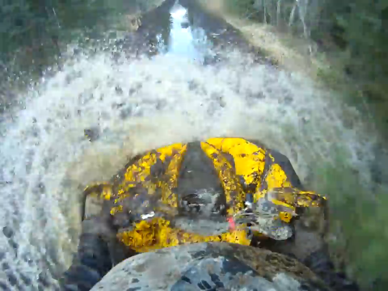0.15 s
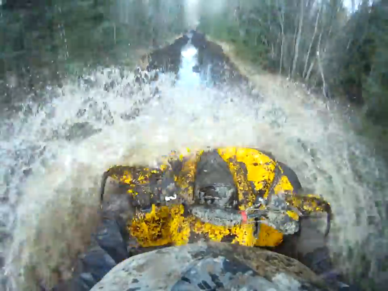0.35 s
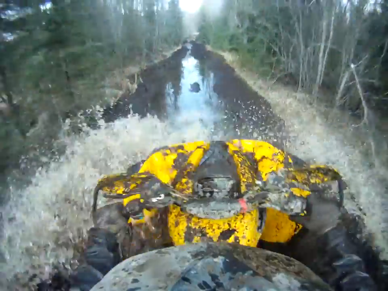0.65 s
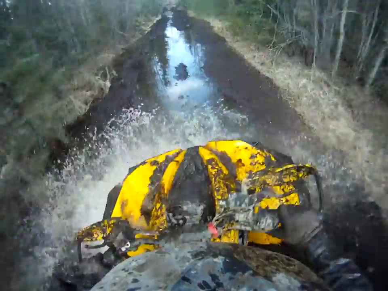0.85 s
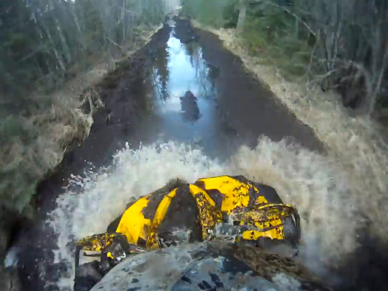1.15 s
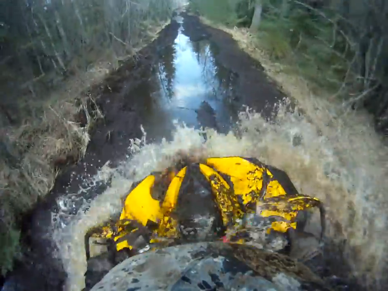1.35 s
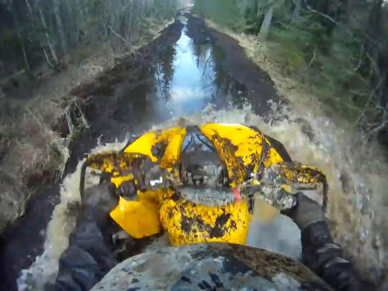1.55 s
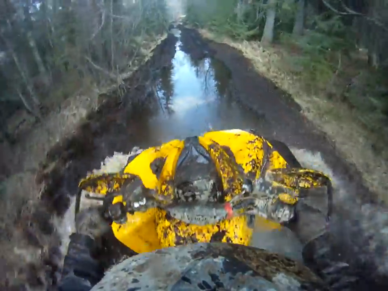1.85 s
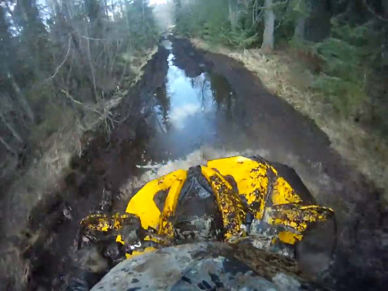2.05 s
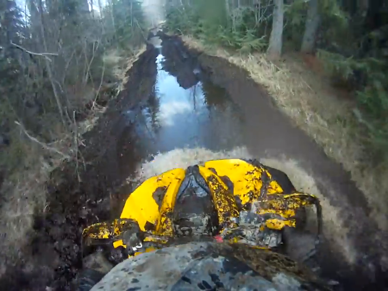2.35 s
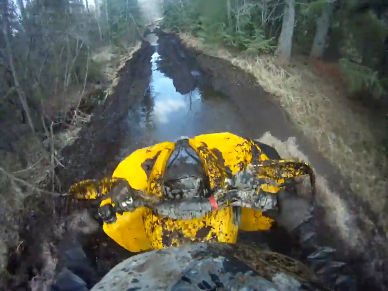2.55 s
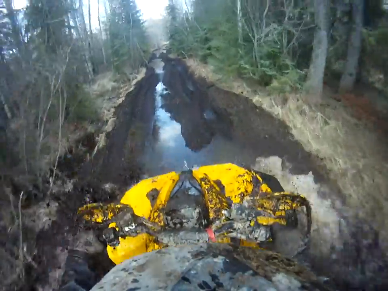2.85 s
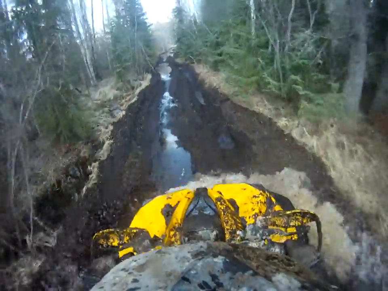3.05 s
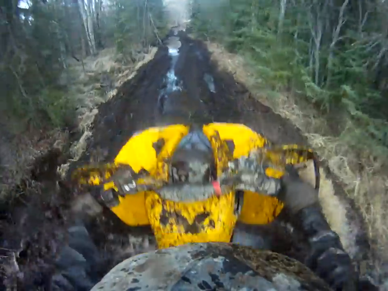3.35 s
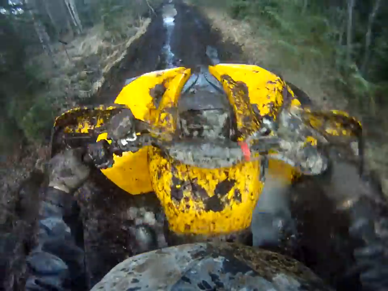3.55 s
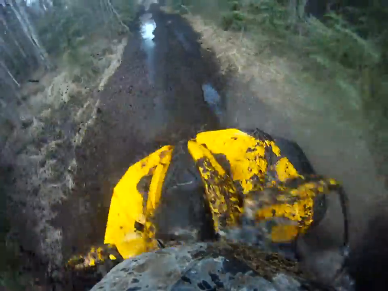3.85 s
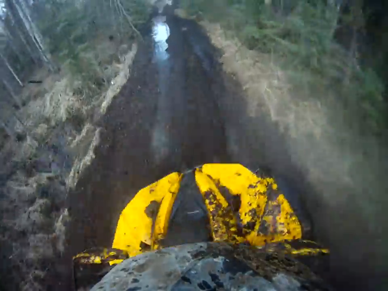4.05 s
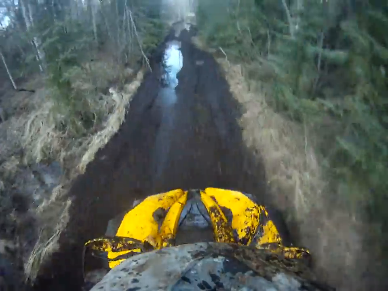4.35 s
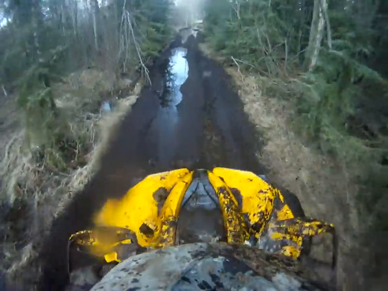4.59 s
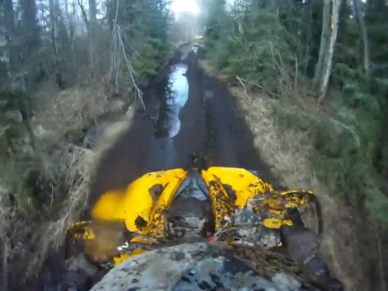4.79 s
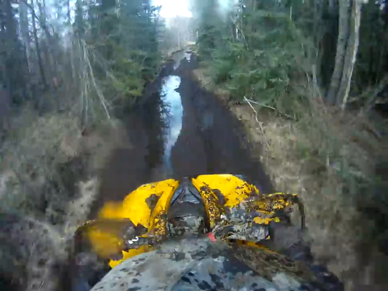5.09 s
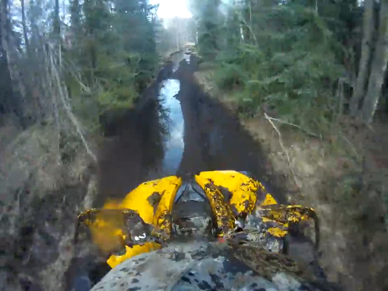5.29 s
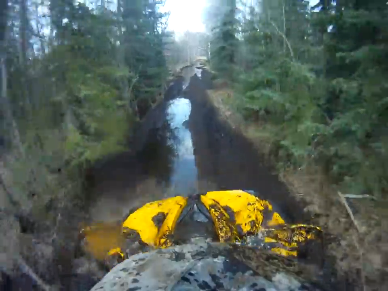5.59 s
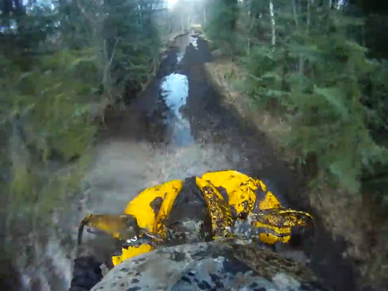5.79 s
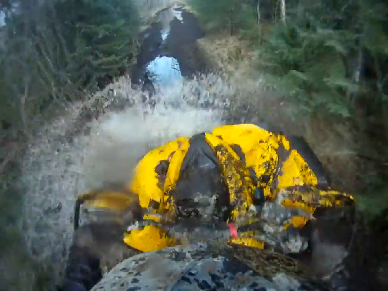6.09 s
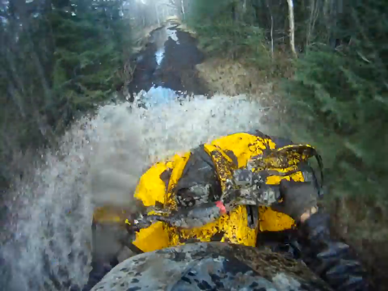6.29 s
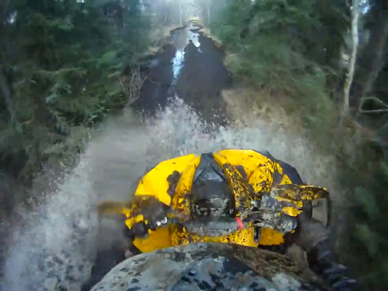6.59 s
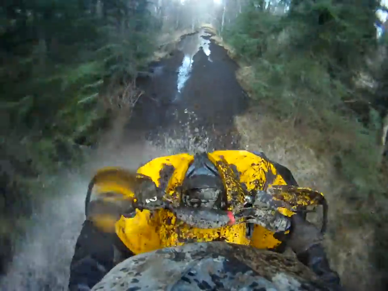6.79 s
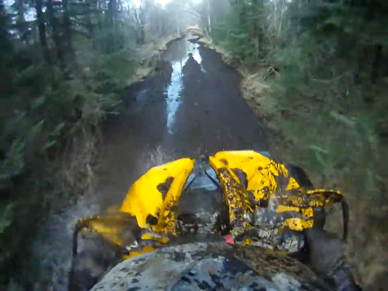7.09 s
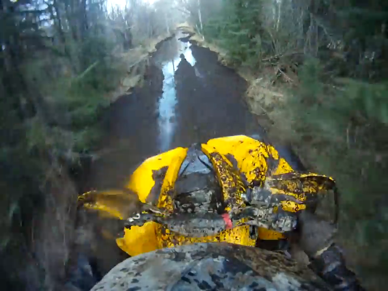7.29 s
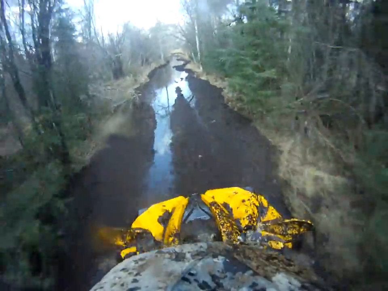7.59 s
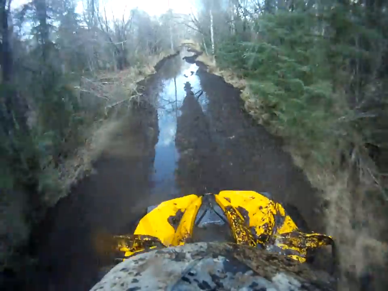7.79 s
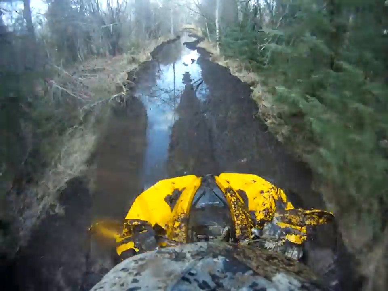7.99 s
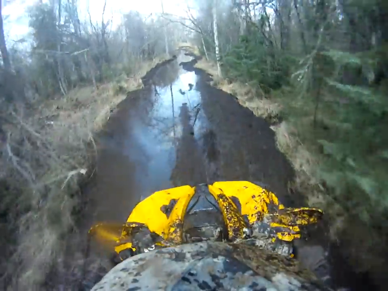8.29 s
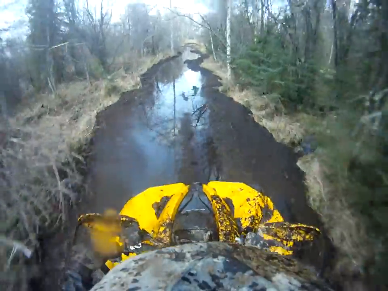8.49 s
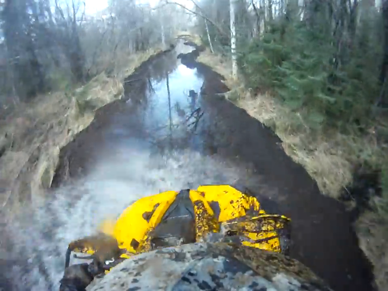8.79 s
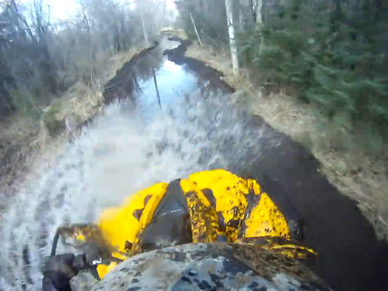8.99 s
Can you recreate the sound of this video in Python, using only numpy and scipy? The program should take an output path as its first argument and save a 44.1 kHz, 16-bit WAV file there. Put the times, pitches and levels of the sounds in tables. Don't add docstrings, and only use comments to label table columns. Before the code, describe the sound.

Rough twin-cylinder quad engine revving and dropping on a muddy trail, gears clattering, splashes hissing, mud lumps knocking the microphone housing.

```python
import sys
import numpy as np
from scipy import signal
from scipy.fft import rfft, irfft, next_fast_len
from scipy.io import wavfile
from scipy.ndimage import uniform_filter1d, map_coordinates

SR = 44100
rng = np.random.default_rng(int(sys.argv[2]) if len(sys.argv) > 2 else 0)


def gain_from_db(level_db):
    decades = np.asarray(level_db, float) / 20
    return 10 ** decades


def persist_wave(psi):
    counts = np.round(np.clip(psi, -1, 1) * 32767).astype(np.int16)
    wavfile.write(sys.argv[1], SR, np.atleast_2d(counts).T)


N = 403064

# t/s, rate/(cycles/s)
CRUISE = [(0.0, 36.2), (0.9, 34.7), (2.6, 40.0), (3.4, 46.6), (4.2, 35.6), (5.3, 40.2), (6.4, 39.3),
          (6.9, 33.8), (7.8, 31.3), (9.14, 41.0)]
# peak t/s, extra rate/(cycles/s), rise/s, fall/s
SURGES = [(0.28, 12.7, 0.112, 0.168), (0.58, 9.2, 0.075, 0.127), (1.22, 3.3, 0.108, 0.056),
          (1.5, 6.8, 0.169, 0.133), (1.73, 11.2, 0.099, 0.233), (2.02, 9.4, 0.071, 0.299),
          (3.14, 1.9, 0.149, 0.134), (3.66, 15.4, 0.147, 0.158), (4.03, 6.8, 0.097, 0.086),
          (4.39, 1.7, 0.112, 0.053), (4.71, 2.5, 0.169, 0.164), (5.09, 1.9, 0.071, 0.129),
          (5.53, 2.7, 0.103, 0.095), (5.77, 2.2, 0.045, 0.135), (6.18, 3.3, 0.129, 0.093),
          (6.66, 8.1, 0.124, 0.095), (7.1, 7.8, 0.095, 0.079), (7.38, 11.3, 0.102, 0.113),
          (7.6, 6.4, 0.3, 0.287), (8.17, 3.9, 0.245, 0.3)]
# t/s, second cylinder strength/0-1, its lag/cycles, brightness/(dB/oct), narrowness/(dB/oct^2)
FIRING = [(0.0, 0.6, 0.351, 25.0, -20.0), (0.25, 0.69, 0.379, 10.0, -3.0), (0.5, 0.57, 0.364, -12.0, 19.0),
          (0.8, 0.0, 0.345, 15.0, -19.0), (1.15, 0.28, 0.394, 16.0, -10.0), (1.75, 0.57, 0.354, 9.0, -8.0),
          (2.3, 0.0, 0.357, -5.0, 5.0), (3.1, 0.0, 0.374, 14.0, -17.0), (3.6, 0.71, 0.36, 1.0, -8.0),
          (4.15, 0.05, 0.354, 4.0, 0.0), (4.9, 0.58, 0.398, 10.0, -6.0), (5.6, 0.63, 0.396, 11.0, 7.0),
          (6.4, 0.9, 0.393, 6.0, 3.0), (6.86, 0.1, 0.366, 12.0, -12.0), (7.35, 0.76, 0.365, 5.0, 5.0),
          (7.65, 0.0, 0.345, -6.0, 25.0), (8.85, 0.0, 0.391, 1.0, 25.0), (9.14, 0.77, 0.379, 19.0, -8.0)]
# t/s, amount/0-1
SLOSH = [
    (0, 1),
    (7.55, 1),
    (7.75, .04),
    (8.95, .04),
    (9.14, .6),
]
# t/s, level/dB
OUTLET = [(0, -32), (.12, -22), (.72, -25.5), (.88, -37), (1.03, -25.5), (1.8, -31.5), (2.05, -25.5),
          (2.8, -30.5), (3.25, -36), (3.5, -23.5), (3.95, -27.5), (4.2, -31.5), (4.8, -27.5), (6.0, -28.5),
          (6.4, -28), (6.7, -29), (7.38, -26), (9.14, -27)]
# t/s, mud drag/dB, water thrown/dB
GROUND = [(0, 0, 3.4), (.6, 5.5, 1.5), (.92, 7, 4), (1.05, -1, 4), (1.3, 1.5, -1.5), (1.7, 4.5, -1.5),
          (2.1, -1, -1), (3.3, 3, 0.5), (3.75, -2, 0), (4.05, 1, 2), (4.3, -2, -.5), (6.45, -1.5, -0.3),
          (6.9, 3, 2), (7.25, 0, .1), (7.55, 1, 3.5), (7.72, .5, -4), (8.0, -4, -3.5), (9.14, 2.5, -2)]
# t/s, level/dB, width/s
SHAKES = [(.25, -1.5, .03), (1.66, 2, .05), (1.9, 6, 0.019), (1.99, 5, 0.039), (3.36, 0, .05),
          (3.5, 3, 0.1), (3.6, 1.5, 0.023), (6.22, 3.5, 0.053), (6.55, -0.5, 0.047), (7.05, 1, 0.028),
          (7.31, 1.5, 0.032)]
# t/s, peak level/dB, ring f/Hz, decay/cycles
LUMPS = [
    (4.3429, -16, 1990, 12),
    (4.343, -18, 1250, 8),
    (4.3431, -19, 3500, 16),
    (4.9926, -15.5, 2300, 26),
    (4.9945, -22, 3500, 28),
    (4.9964, -19, 1220, 14),
    (5.52, -24, 3550, 30),
    (6.152, -21, 1900, 9),
]
# t/s, peak level/dB, f/Hz, decay/cycles
JOLTS = [(.8, -26, 113, 13), (.92, -28, 110, 12), (3.8, -25, 140, 9), (4.25, -20, 78, 7),
         (4.8, -28, 100, 15), (5.0, -18, 92, 9), (5.703, -26, 103, 12), (5.735, -16, 20, 2.6),
         (6.8, -23, 87, 18), (6.85, -27, 270, 14), (7.8, -27, 110, 14)]

# f/Hz, level/dB
PIPE_DB = [(60, -40), (100, -6), (140, -11), (180, 4), (220, 1.1), (280, 1), (340, -6.5), (415, -25),
           (450, -38), (600, -120)]
TAILPIPE_DB = [(390, -54), (440, -4.5), (520, 1), (620, 1.5), (690, -17), (900, -15), (1250, -11),
               (1400, -50)]
# f/Hz, level/(dB per Hz)
GEAR_DB = [(600, -57), (700, -12.5), (950, -11.5), (1050, -4), (1240, 1.5), (1420, -10.5), (1500, -36.5)]
VALVE_DB = [(1250, -22), (1500, -6), (1580, 1), (1640, -2), (1750, -0.5), (1820, -1.5), (2000, -2),
            (2230, 2.5), (2310, -2), (2380, -6), (2470, -4), (2750, -9.5), (2890, -20), (3100, -50)]
DROP_DB = [(2600, -34), (2890, -8.5), (3080, -3), (3300, -6), (3570, 2.5), (3700, -4), (4200, -21),
           (4800, -29)]
MIST_DB = [(3700, -21), (4300, -10.5), (5100, -1), (5500, -4.5), (6000, -16), (7000, -90)]
TYRE_DB = [(20, -12), (50, 0.5), (120, -1.5), (300, -6), (600, -12), (750, -23), (1000, -56)]
# f/Hz, width/Hz, level/dB
CASING = [(970, 87, -4), (1094, 10.5, 9), (1158, 13, 8), (1415, 28, 3)]

# at the middle rate/dB, slope/(dB per 10 cycles/s), bend above the middle/dB,
# speeding up/dB, slowing down/dB (both per 50 cycles/s per s)
BOOM_LAW = (-27.5, 13.5, -7.5, 1.5, -1.9)
RASP_LAW = (-41.5, 5, -1.5, 8, -2)
GEAR_LAW = (-38, 6.5, 0.2, 7, -1.4)
VALVE_LAW = (-33.5, 3, 2.5, 2.5, -0.4)
DROP_LAW = (-40.5, 3, 1.1, 2, 0.8)
FLUTTER_DB = {"boom": 1.4, "exhaust": 1.3, "rasp": 2, "gears": .9, "valves": .5}

MIDDLE_RATE_HZ, LAG_S = 44, .06
WARM_RATE_HZ, WARM_POWER = 41, .75
DRY_TYRES_DB, DRY_RASP_DB = 0.5, -3
START_CYCLE = .27


def unit(x):
    return x / np.sqrt(np.mean(x ** 2) + 1e-20)


def along(points, hz):
    f, v = np.transpose(points)
    return np.interp(np.log(hz + 1), np.log(f + 1), v)


def curves(rows):
    s, *cols = np.transpose(rows)
    return [np.interp(np.arange(N) / SR, s, c) for c in cols]


def wobble(rate_hz):
    knots = rng.standard_normal(int(N * rate_hz / SR) + 4)
    return map_coordinates(knots, [np.arange(N) * rate_hz / SR], order=1)


def coloured(x, spectrum):
    m = next_fast_len(N + 8192)
    gain = gain_from_db(along(spectrum, np.fft.rfftfreq(m, 1 / SR)))
    return unit(irfft(rfft(x, m) * gain, m)[:N])


def steady(x):
    return x / np.sqrt(np.abs(uniform_filter1d(x ** 2, size=SR // 8)) + 1e-12)


def speed():
    peak_s, extra, rise_s, fall_s = np.transpose(SURGES)[..., None]
    grid = np.arange(0, N + 100, 100)
    late_s = grid / SR - peak_s
    width_s = np.where(late_s < 0, rise_s, fall_s)
    humps = (extra * np.exp(-.5 * (late_s / width_s) ** 2)).sum(axis=0)
    return curves(CRUISE)[0] + np.interp(np.arange(N), grid, humps)


def level(law):
    rate, lag = speed(), round(LAG_S * SR)
    revs = (rate - MIDDLE_RATE_HZ) / 10
    earlier = np.pad(rate, (lag, 0), mode="reflect", reflect_type="odd")[:N]
    push = (rate - earlier) / LAG_S / 50
    return np.dot(law, [np.ones(N), revs, np.maximum(revs, 0) ** 2, np.maximum(push, 0), np.maximum(-push, 0)])


def shudder_db():
    t = np.arange(N) / SR
    return sum(db * np.exp(-.5 * ((t - s) / width) ** 2) for s, db, width in SHAKES)


def firing_pair(k, cycle, slosh, second, lag):
    jitter = slosh * .015 + (1 - slosh) * .05 * (k > 10)
    drift = slosh * 1.8 * wobble(2) + jitter * k * wobble(25)
    delay = 1.1 + 1.1 * np.tanh(.05 * (k - 6) ** 3) + .3 * max(k - 10, 0) ** 2
    turn = 2 * np.pi * k * cycle + delay + drift
    pair = np.cos(turn) + second ** (9 / max(k, 9)) * np.cos(turn - 2 * np.pi * k * lag)
    return pair * gain_from_db((.8 + 1.1 * slosh) * wobble(4) + 3.2 * slosh * wobble(9))


def exhaust(cycle):
    rate, (slosh,) = speed(), curves(SLOSH)
    second, lag, brightness_db, narrowness_db = curves(FIRING)
    boom_db = level(BOOM_LAW) + curves(GROUND)[0] - 1.6 + FLUTTER_DB["boom"] * wobble(12)
    exhaust_db = curves(OUTLET)[0] + FLUTTER_DB["exhaust"] * wobble(7) - 1.05
    rasp_db = level(RASP_LAW) + 0.68 * shudder_db() + DRY_RASP_DB * (1 - slosh)
    rasp_db = rasp_db + FLUTTER_DB["rasp"] * wobble(6) - 1.0
    low, high = np.zeros(N), np.zeros(N)
    for k in range(3, 27):
        pair = firing_pair(k, cycle, slosh, second, lag)
        cool_hz = k * rate / np.maximum(rate / WARM_RATE_HZ, 1) ** WARM_POWER
        octaves = np.clip(np.log2(cool_hz / 270), -1.2, .65)
        low += gain_from_db(along(PIPE_DB, cool_hz) + brightness_db * octaves - narrowness_db * octaves ** 2) * pair
        slow_db = 4.7 * np.clip(rate - 46, -8, 0) * np.maximum(np.log2(k * rate / 540), 0)
        high += gain_from_db(along(TAILPIPE_DB, k * rate) + slow_db) * pair
    boom = gain_from_db(boom_db) * np.sqrt(2) * np.cos(4 * np.pi * cycle + 0.95)
    throb_db = -43.0 + 1.7 * (rate - 49.0) + 3.1 * wobble(6.07)
    throb = gain_from_db(throb_db) * np.cos(2 * np.pi * cycle)
    return boom + throb + gain_from_db(exhaust_db) * steady(low) + gain_from_db(rasp_db) * steady(high)


def gears(rattle_db, load, shaken):
    hz = np.linspace(600, 6000, num=1800)
    rings = sum(gain_from_db(2 * db) / (1 + (2 * (hz - c) / w) ** 2) for c, w, db in CASING)
    casing_db = 10 * np.log10(rings) - 6.5 * np.log2(np.maximum(hz / 2400, 1))
    casing = coloured(rng.standard_normal(N) * shaken, np.transpose([hz, casing_db]))
    rattle = coloured(rng.standard_normal(N) * shaken, GEAR_DB)
    return gain_from_db(rattle_db) * (np.sqrt(1 - load) * rattle + np.sqrt(load) * casing)


def valves(shaken):
    clatter_db = level(VALVE_LAW) + 0.47 * shudder_db() + 0.44 * curves(GROUND)[1]
    clatter_db = clatter_db + FLUTTER_DB["valves"] * wobble(9)
    return gain_from_db(clatter_db) * coloured(rng.standard_normal(N) * shaken, VALVE_DB)


def racket(cycle):
    rattle_db = level(GEAR_LAW) + shudder_db() + 0.5 * curves(GROUND)[1] + FLUTTER_DB["gears"] * wobble(9)
    load = np.clip((rattle_db + 39.0) / 16, 0, .9)
    beat_db = 1.2 * np.cos(2 * np.pi * cycle + 1.3) + 1.9 * np.cos(4 * np.pi * cycle + 0.38)
    shaken = gain_from_db(load * beat_db + 0.88 * wobble(150) + 0.61 * wobble(20))
    return gears(rattle_db, load, shaken) + valves(shaken)


def spray_level_db():
    return level(DROP_LAW) + curves(GROUND)[1]


def spray(cycle):
    spray_db = spray_level_db() + 0.22 * shudder_db()
    beat = np.cos(2 * np.pi * cycle + 1.3)
    drops = rng.standard_normal(N) * gain_from_db(.5 * beat + 0.63 * wobble(200) + 0.35 * wobble(20))
    mist = gain_from_db(0.63 * (spray_db + 40) - 45.5) * coloured(drops, MIST_DB)
    return gain_from_db(spray_db - 1) * coloured(drops, DROP_DB) + mist


def blows(rows):
    out, t = np.zeros(N + SR), np.arange(SR // 4) / SR
    for s, db, hz, cycles in rows:
        shape = (1 - np.exp(-t * hz)) * gain_from_db(db + 6.5 - 60 * t * hz / cycles)
        out[round(s * SR):][:len(t)] += shape * np.sin(2 * np.pi * hz * t)
    return out[:N]


def tyres():
    firm_db = DRY_TYRES_DB * (1 - curves(SLOSH)[0])
    churn_db = 0.58 * (spray_level_db() + 43.5) - 40 + firm_db + 1.3 * wobble(8)
    return gain_from_db(churn_db) * coloured(rng.standard_normal(N), TYRE_DB)


def scene():
    cycle = START_CYCLE + np.cumsum(speed()) / SR
    engine = exhaust(cycle) + racket(cycle)
    return (engine + spray(cycle) + blows(LUMPS) + blows(JOLTS) + tyres())[None]


def roll_off(x):
    return signal.sosfilt(signal.butter(12, 15700, fs=SR, output="sos"), x)


def record(dry):
    slow = signal.resample_poly(dry, 40, 147, axis=1)
    held = signal.resample_poly(np.repeat(slow, 4, axis=1), 147, 160, axis=1)
    kept = rfft(held, N) * (np.fft.rfftfreq(N, 1 / SR) < 15310)
    return roll_off(irfft(kept, N))


dry = scene()
out = record(dry)
persist_wave(out)
```